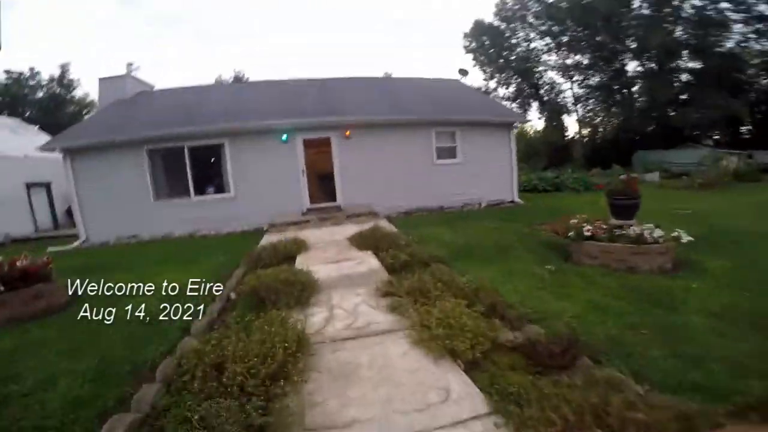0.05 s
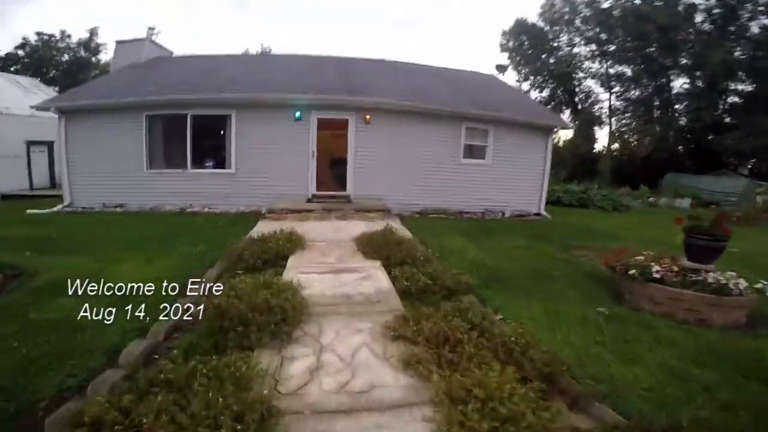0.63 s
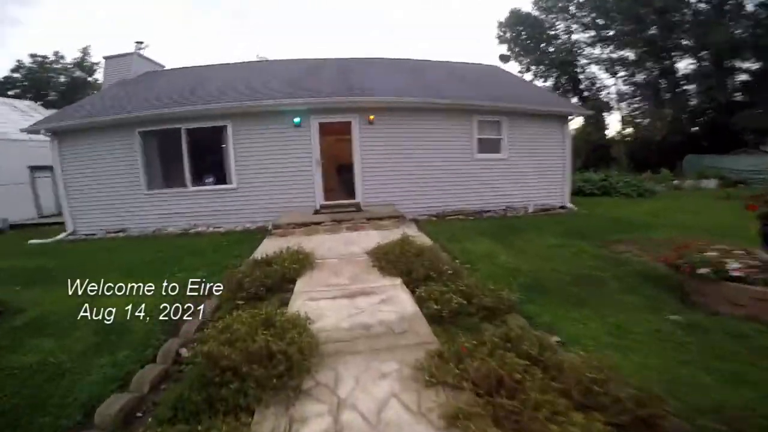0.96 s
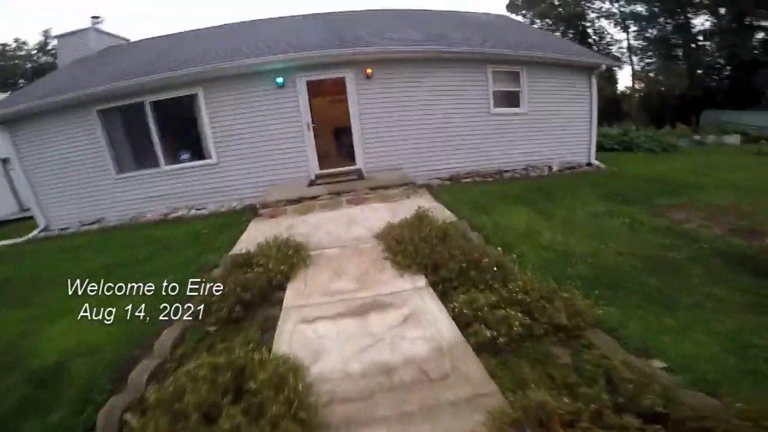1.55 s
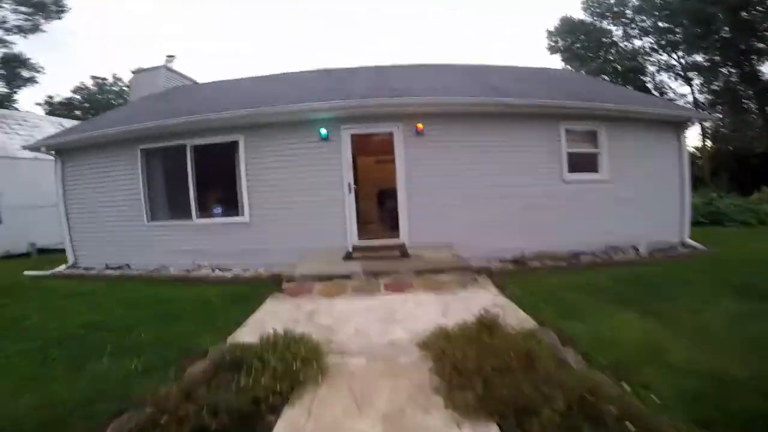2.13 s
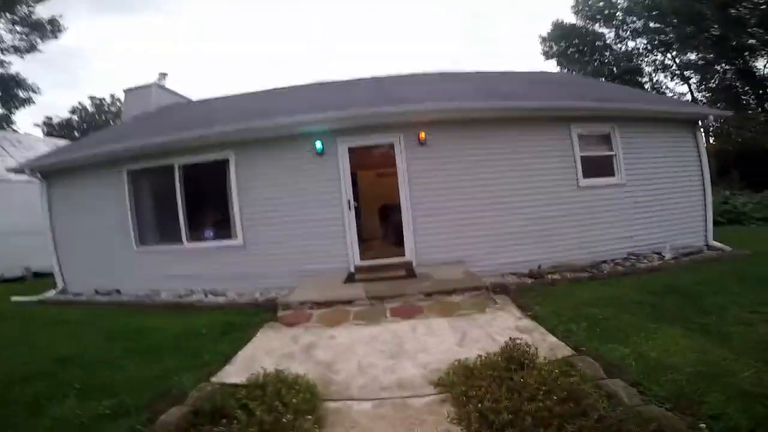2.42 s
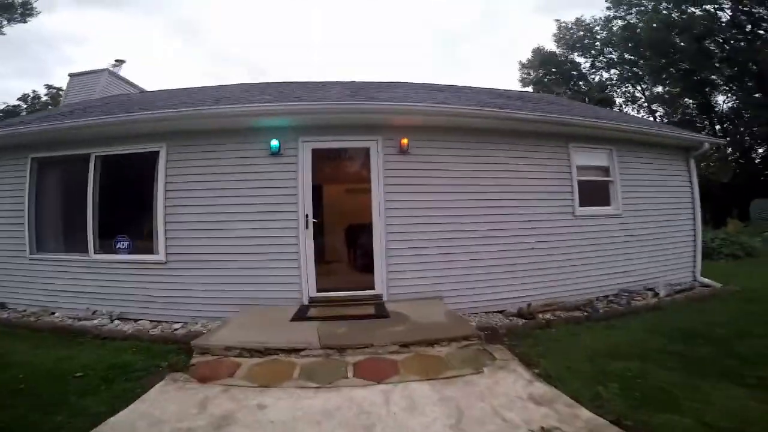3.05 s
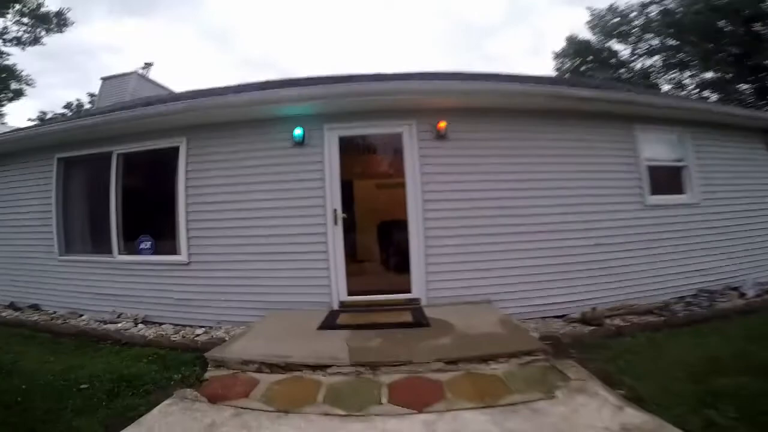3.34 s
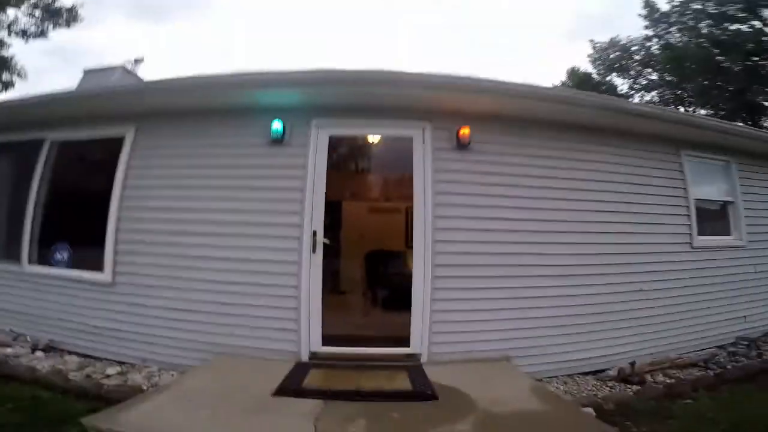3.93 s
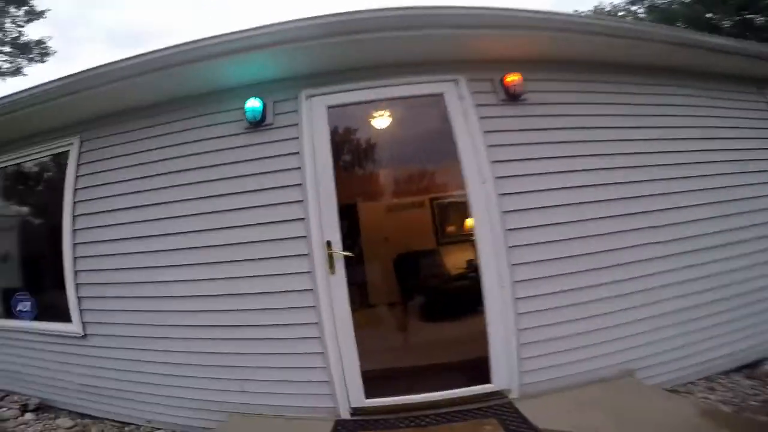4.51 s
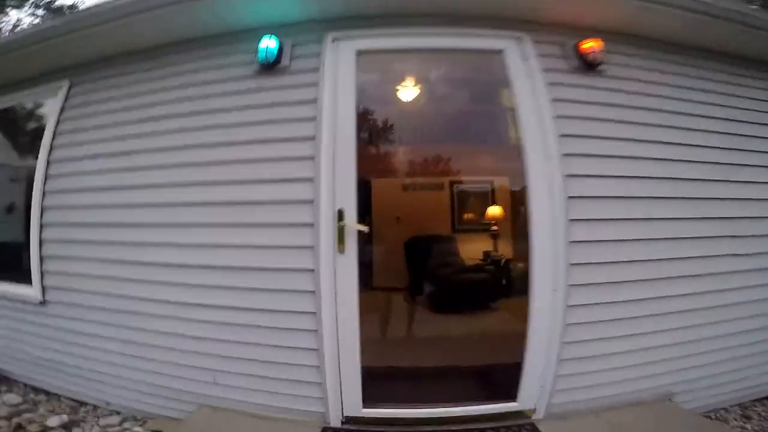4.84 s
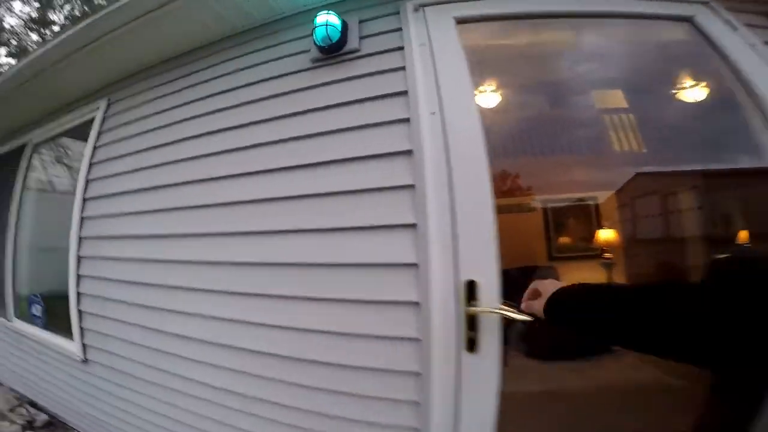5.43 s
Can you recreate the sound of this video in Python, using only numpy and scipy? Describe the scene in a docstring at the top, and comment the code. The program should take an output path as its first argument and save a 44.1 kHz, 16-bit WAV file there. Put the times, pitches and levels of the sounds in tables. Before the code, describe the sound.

Fingers rub, scrape and click on a handheld camera, close up, over dull footsteps on a concrete path outdoors.

```python
"""A concrete path up to a house on a still evening, heard from a small camera in the walker's hand.
Steps thud up through the body, and a thin chirp echoes in the yard. Just after 1 s the fingers regrip:
a loud scrape right on the microphone port, knocks, and a squeak while the hand half covers the port.
A sleeve brushes by; from 2 s rubbing strokes and sharp ticks ring the plastic shell. After 3.5 s the
hand quietens and soles scuff below. Soft air and faint, far insects lie behind it all."""
import sys
import numpy as np
from scipy import signal
from scipy.fft import rfft, irfft, next_fast_len
from scipy.io import wavfile
from scipy.ndimage import map_coordinates

SR = 44100
rng = np.random.default_rng(int(sys.argv[2]) if len(sys.argv) > 2 else 0)


def bounce(signal):
    """Save signal as a 16-bit WAV file at the path given by the first command-line argument."""
    frames = np.transpose(np.atleast_2d(signal))
    limited = np.clip(frames, -1, 1)
    pcm = np.round(limited * 32767).astype(np.int16)
    wavfile.write(sys.argv[1], SR, pcm)


N = 250047

# fingers sliding on the case, centimetres from the microphone:
# (time of fastest moment [s], rise [s], fall [s], friction level [dB], shudder level [dB])
FINGER_STROKES = [(0.01, 0.047, 0.036, -35, -36.5), (0.075, 0.028, .03, -31.5, -26),
                  (0.133, 0.018, 0.082, -41.5, -44.5), (0.48, 0.042, .025, -38.5, -40),
                  (0.532, .025, 0.095, -39.5, -41), (0.692, 0.032, 0.059, -46, -41),
                  (0.822, 0.035, 0.021, -38.5, -43.5), (0.976, 0.062, 0.066, -41, -46.5),
                  (1.135, 0.053, 0.09, -32.5, -30), (1.22, 0.04, 0.043, -33, -20.5),
                  (1.325, 0.028, 0.034, -47, -42), (1.575, 0.087, 0.14, -43.5, -54),
                  (1.728, 0.013, 0.067, -34.5, -26.5), (1.81, 0.11, 0.18, -42.5, -36.5),
                  (2.0, 0.072, 0.18, -33, -43.5), (2.109, 0.069, .05, -27.5, -34),
                  (2.184, 0.053, 0.04, -22.5, -31.5), (2.286, 0.042, 0.083, -31.5, -32),
                  (2.399, 0.071, 0.028, -33.5, -40), (2.477, 0.11, 0.081, -27, -32),
                  (2.635, 0.039, 0.1, -33, -33.5), (2.737, 0.0071, 0.033, -29.5, -32.5),
                  (2.864, 0.067, 0.064, -24.5, -25.5), (3.014, 0.096, 0.16, -44, -38.5),
                  (3.262, 0.087, 0.071, -37, -38.5), (3.323, 0.027, 0.026, -24.5, -27),
                  (3.452, 0.062, 0.021, -36.5, -34), (3.81, 0.14, 0.068, -54, -56.5),
                  (3.935, 0.074, 0.031, -43, -34), (4.019, 0.058, 0.073, -52, -47.5),
                  (4.451, 0.024, 0.034, -36.5, -49), (4.504, 0.017, 0.052, -42, -45.5),
                  (4.915, 0.042, 0.03, -50.5, -51), (5.01, 0.044, 0.034, -44, -42),
                  (5.09, 0.038, 0.054, -48, -46), (5.64, 0.034, 0.074, -55.5, -53.5)]
# a finger scraping right on the port: (time [s], length [s], level [dB], treble tilt [dB/octave])
PORT_SCRAPES = [(1.134, 0.0044, -11.5, -6), (1.142, .018, -16, 0.5), (1.1697, 0.0064, -4, 1),
                (1.18, .003, -7.5, 4), (1.188, 0.017, -20, -4.5), (1.23, 0.012, -29, 0),
                (1.244, 0.022, -40.5, 0)]
# ticks and creaks of the case: (time [s], level [dB], centre [Hz], relative tap level [dB], t60 [s])
CASE_TICKS = [(.058, -16, 1700, -17, 0.023), (0.328, -35.5, 2030, -11, 0.016),
              (0.3858, -23, 2030, -20, 0.016), (0.481, -21.5, 3050, -32, .012),
              (0.6823, -26.5, 2600, -22, 0.014), (0.7638, -32, 3300, -28, 0.013),
              (1.1176, -4.5, 2080, -17, 0.0087), (1.3304, -21, 3460, -5, 0.0075),
              (1.4486, -32, 1670, -7.5, 0.0091), (1.6063, -17.5, 1830, -7.5, 0.014),
              (1.7127, -19, 1910, -8.5, 0.013), (1.7637, -5.5, 3020, -11, 0.0075),
              (1.8422, -31, 1880, -16, 0.014), (1.852, -14, 1890, -22, 0.011),
              (2.382, -18.5, 2220, -12, 0.011), (2.5414, -10, 2190, -11, 0.0073),
              (2.603, -24, 2080, -16, 0.014), (2.8563, -2.5, 2260, -20, 0.0065),
              (2.872, -12, 2430, -34, 0.013), (2.8905, -1.5, 2490, -19, 0.0065),
              (2.934, -18.5, 2240, -7, 0.0086), (3.148, -34.5, 2640, -29, 0.034),
              (3.3085, -10, 2350, -37, 0.014), (3.337, -1.5, 3700, -22, .0065),
              (3.3732, -18.5, 2500, -3.5, 0.011), (3.445, -20, 2120, -9.5, 0.027),
              (4.3374, -31, 4200, -17, 0.018), (4.8726, -29, 2620, -6.5, 0.012),
              (5.02, -23.5, 3870, -28, 0.0078), (5.3937, -35, 3660, -23, 0.0095)]
# fingertips landing on the case: (time [s], level [dB], settled pitch [Hz], t60 [s])
FINGER_KNOCKS = [(0.387, -16, 123, 0.013), (1.119, -11.5, 72, 0.1), (1.153, -9.5, 98.7, 0.14),
                 (1.174, -5.5, 85, 0.056), (1.211, -15, 171.5, 0.066), (1.331, -23, 115.3, 0.057),
                 (1.6122, -3.5, 118, 0.069), (1.7147, -10.5, 123, 0.1), (1.766, -11.5, 99, 0.067),
                 (2.093, -17.5, 103, 0.15), (2.541, -25.5, 264, 0.092), (2.891, -16, 96, 0.16),
                 (3.932, -19, 150, 0.022), (3.94, -9, 190, 0.025), (4.005, -21, 120, 0.022),
                 (4.979, -22, 109.2, 0.035)]
# skin squeaking on plastic: (time [s], pitch [Hz], level [dB])
SKIN_SQUEAK = [(1.825, 485.4, -45.5), (1.838, 596, -27.5), (1.843, 675, -26), (1.855, 731, -21),
               (1.859, 780, -39), (1.87, 845, -35.5), (1.9, 1058, -34), (1.915, 1070, -46)]
# a sleeve brushing past the port: (time [s], length [s], level [dB])
SLEEVE_BRUSHES = [(1.712, 0.035, -53), (1.964, 0.14, -49.5), (2.15, 0.037, -52.5), (2.28, 0.042, -53.5)]
# how far the hand covers the port: (time [s], cover [0-1])
PORT_COVER = [(1.33, 0.05), (1.42, 0.78), (1.52, 0.67), (1.57, 0.31), (1.68, 0.42), (1.74, 0.5),
              (1.9, 0.16), (2.0, 0.03)]
# footfalls and bumps carried to the camera: (middle time [s], level [dB], pitch [Hz], half length [s])
BODY_THUDS = [(0.08, -16, 54, 0.014), (0.519, -15, 40.5, 0.014), (1.186, -5, 34, 0.013),
              (1.338, -22.5, 72, 0.008), (1.927, -18.5, 51, 0.015), (3.331, -16, 54, 0.0054),
              (3.408, -18, 17.6, 0.058), (3.878, -13.5, 33, 0.018), (3.96, -15.5, 19, 0.015),
              (4.138, -26.5, 39.7, 0.029), (4.452, -18, 30, 0.024), (4.525, -19, 16.8, 0.054),
              (4.734, -25, 38, 0.02), (5.308, -27, 40.5, 0.02)]
# soles on the concrete below: (time [s], length [s], level [dB], relative hollow level [dB])
SOLE_SCUFFS = [(2.087, 0.01, -31, 2), (3.86, .012, -38, -17), (3.907, 0.0028, -28, -1),
               (3.917, 0.0056, -30, -7), (3.928, 0.0075, -24.5, -36), (3.939, 0.0052, -28, -4.5),
               (4.004, 0.0075, -48.5, -3), (4.426, 0.0031, -39.5, -4.5), (4.454, 0.0094, -42.5, -20),
               (4.502, 0.0037, -32.5, -6.5), (4.979, 0.0016, -50, 6.5), (5.298, 0.0037, -49.5, -3.5),
               (5.503, 0.0019, -41, -10)]
# a thin chirp in the yard, rising briefly and then falling: (time [s], pitch [Hz], level [dB])
YARD_CHIRP = [(.196, 4700, -41), (.207, 5080, -49), (.213, 5620, -26), (.228, 4700, -56), (.245, 4050, -47),
              (.258, 2950, -51), (.268, 2440, -66), (.29, 2050, -76)]
# resonances of the plastic shell: (centre [Hz], half width [Hz], lift [dB])
SHELL_RESONANCES = [(770, 130, 6), (1530, 70, 5), (2150, 130, 6), (2490, 100, 4), (3050, 130, 3),
                    (3520, 230, 9), (4280, 120, 6), (4720, 110, 4), (5130, 240, 10), (6950, 180, 10),
                    (7900, 450, 8), (9280, 330, 15), (12150, 350, 11)]

# tone colours at the microphone, each (frequency [Hz], relative level [dB])
FRICTION_SPECTRUM = [(150, -26.5), (400, -25), (600, -19), (1100, -16), (1900, 2), (2400, -0.5), (3000, -7),
                     (4000, -14.5), (5000, -22), (6000, -32), (9000, -39.5), (11000, -46), (15000, -51)]  # skin sliding on plastic
SHUDDER_SPECTRUM = [(30, -4), (70, 8), (110, 1.5), (165, -3), (270, -7), (420, -20.5), (700, -32.5),
                    (1500, -52.5)]  # the case shaking in the grip
SCRAPE_SPECTRUM = [(100, -4.5), (300, -2.5), (600, -19), (1050, -16), (1550, 0), (2700, 1), (3800, 5),
                   (4600, -10.5), (5500, -11.5), (7000, -13), (8500, -20.5), (10500, -20.5), (15500, -36)]  # a finger on the port
TICK_SPECTRUM = [(200, -22), (700, -17.5), (1500, 1.5), (2800, 1.5), (4500, -5.5), (6500, -16),
                 (10000, -21), (15000, -31)]  # plastic snapping
HOLLOW_SPECTRUM = [(80, -13), (200, 0.5), (350, -3), (550, -10.5), (800, -1.5), (1300, -22), (2500, -30),
                   (6000, -62.5)]  # the hollow body of ticks and scuffs
SQUEAK_SPECTRUM = [(400, -16), (720, 3), (1000, -7), (1600, 8), (3200, -2), (3900, -11.5), (4700, -11),
                   (5800, -53)]  # squeaking skin
SLEEVE_SPECTRUM = [(1000, -29), (3000, 8.5), (5000, -3), (7500, 5), (10500, -10.5), (15000, -10.5)]  # hissing cloth
GRIT_SPECTRUM = [(300, 7.5), (700, -9), (1150, -8.5), (2000, 10.5), (3200, -1.5), (4600, -8), (6000, -39),
                 (15000, -49)]  # grit under a sole
RUMBLE_SPECTRUM = [(8, -23), (18, 0.5), (30, -6), (60, -16), (110, -24), (250, -58), (600, -92)]  # the carrying arm
CHIRP_SPECTRUM = [(1500, -8), (2500, 15.5), (5500, -4), (9200, 6.5), (11000, -17), (14000, -16)]  # the shrill chirp
AIR_SPECTRUM = [(120, 8), (250, 4.5), (450, -1), (1000, 1.5), (2200, -8), (3000, -2), (4500, 2),
                (6200, -4.5), (8000, -5.5), (10000, -13), (15000, -14.5)]  # open evening air


def rubbing(slips_per_s=900, flutter_db=1.17, resting_grip_db=-63.5):
    """Sliding fingers make a stream of tiny slips over smooth friction, ringing the shell."""
    strokes = [(db, swell(s, rise, fall)) for s, rise, fall, db, _ in FINGER_STROKES]
    slips = (rng.random(N) < slips_per_s / SR) * rng.standard_normal(N)
    force = (unit(slips) + rng.standard_normal(N)) * amp(flutter_db * wobble(130))
    ringing = filtered(force, lambda hz: gain(FRICTION_SPECTRUM, hz) * shell(hz))
    return power_sum(resting_grip_db, strokes) * unit(ringing)


def shell(hz):
    """Gain of the plastic shell around the microphone, lifted at its resonances."""
    return amp(sum(db * np.exp(-((hz - centre) / width) ** 2) for centre, width, db in SHELL_RESONANCES))


def case_shudder(resting_grip_db=-58.5):
    """In each stroke the skin catches and shakes the case; even a resting grip is never quite still."""
    catching = amp(3 * wobble(45))
    shaking = noise(lambda hz: gain(SHUDDER_SPECTRUM, hz)) * catching
    return power_sum(resting_grip_db, shudder_swells()) * unit(shaking)


def shudder_swells(spread=1.33):
    """Each stroke's (level [dB], envelope) of shaking, spread times as long as its friction."""
    return [(db, swell(s, spread * rise, spread * fall)) for s, rise, fall, _, db in FINGER_STROKES]


def port_scrapes(t60=0.024, attack=0.00043, chatter_db=3):
    """Right on the microphone port each slip is loud and bright, and chatters as the skin catches."""
    out = np.zeros(N)
    chatter = amp(chatter_db * wobble(500))
    for s, length, db, tilt_db in PORT_SCRAPES:
        tilt = lambda hz: amp(tilt_db * np.log2(np.maximum(hz, 1200) / 3000))
        smooth = slide_envelope(length, attack, t60)
        envelope = smooth * chatter[round(s * SR):][:len(smooth)]
        envelope *= np.linalg.norm(smooth) / np.linalg.norm(envelope)
        add(out, s, amp(db) * burst(lambda hz: gain(SCRAPE_SPECTRUM, hz) * tilt(hz), envelope))
    return out


def case_ticks(attack=0.00093, focus_db=7, focus_octaves=0.45, edge_ratio=1.3,
               tail_db=-30, tail_t60=0.036, clean_t60=0.0077):
    """The case snaps under the grip: a short ring in the shell over a hollow tap."""
    out, t = np.zeros(N), np.arange(SR // 10) / SR
    for s, db, centre_hz, hollow_db, t60 in CASE_TICKS:
        decay = amp(-60 * t / t60) + amp(tail_db - 60 * t / tail_t60)
        envelope = (1 - np.exp(-t / attack)) * decay
        focus = lambda hz: amp(focus_db * np.exp(-(np.log2((hz + 1) / centre_hz) / focus_octaves) ** 2))
        rolloff = lambda hz: 1 / np.sqrt(1 + (hz / (edge_ratio * centre_hz)) ** 4)  # lower is duller
        colour = lambda hz: gain(TICK_SPECTRUM, hz) * shell(hz) * focus(hz) * rolloff(hz)
        snap = burst(colour, envelope, impact=(clean_t60 / t60) ** 2)  # shorter is cleaner
        tap = amp(hollow_db) * burst(lambda hz: gain(HOLLOW_SPECTRUM, hz), envelope)
        add(out, s, amp(db) * (snap + tap))
    return out


def finger_knocks(pitch_lift=0.68, settle=0.005, attack=0.0025):
    """A fingertip thumps the case; the pitch sags unevenly as the flesh gives way."""
    out, t = np.zeros(N), np.arange(SR // 4) / SR
    give = 1 + 0.14 * wobble(260)
    for s, db, hz, t60 in FINGER_KNOCKS:
        pitch_hz = hz * (1 + pitch_lift * np.exp(-t / settle)) * give[round(s * SR):][:len(t)]
        envelope = amp(db - 60 * t / t60) * (1 - np.exp(-t / attack))
        add(out, s, -envelope * np.sin(2 * np.pi * np.cumsum(pitch_hz) / SR))
    return out


def skin_squeak():
    """Skin on the plastic beside the microphone gives a rough, rubbery, rising squeak."""
    return glide(SKIN_SQUEAK, SQUEAK_SPECTRUM, jitter=0.1, partials=7)


def sleeve(attack=0.01, t60=0.13):
    """Cloth passing close over the port gives a dry hiss."""
    contact = np.zeros(N)
    for s, length, db in SLEEVE_BRUSHES:
        add(contact, s, amp(db) * slide_envelope(length, attack, t60, size=SR // 3))
    return contact * amp(1.2 * wobble(200)) * noise(lambda hz: gain(SLEEVE_SPECTRUM, hz))


def hand_over_port(x, full_cover_db=-15, corner_hz=2300):
    """A hand over the microphone port takes the treble away."""
    cover, = curves(PORT_COVER)
    low = filtered(x, lambda hz: 1 / (1 + (hz / corner_hz) ** 6))
    return low + (x - low) * amp(full_cover_db * cover)


def footfalls():
    """Each footfall reaches the microphone through the body as one soft push and rebound."""
    out = np.zeros(N)
    for s, db, hz, half_length in BODY_THUDS:
        t = np.arange(N) / SR - s
        out -= amp(db) * np.exp(-(t / half_length) ** 2) * np.sin(2 * np.pi * hz * t)
    return out


def sole_scuffs(t60=0.014, attack=0.00026):
    """Down on the path a sole grinds the grit, dull and hollow."""
    out = np.zeros(N)
    for s, length, db, hollow_db in SOLE_SCUFFS:
        envelope = slide_envelope(length, attack, t60)
        grit = burst(lambda hz: gain(GRIT_SPECTRUM, hz), envelope)
        hollow = amp(hollow_db) * burst(lambda hz: gain(HOLLOW_SPECTRUM, hz), envelope)
        add(out, s, amp(db) * (grit + hollow))
    return out


def arm_sway(floor_db=-40, jolt_db=-14, nudge_db=-1):
    """The carrying arm rumbles, more around each footfall and whenever the fingers push the case."""
    jolts = [(db + jolt_db, swell(s, rise=0.11, fall=0.17)) for s, db, _, _ in BODY_THUDS]
    nudges = [(db + nudge_db, envelope) for db, envelope in shudder_swells()]
    return power_sum(floor_db, jolts + nudges) * noise(lambda hz: gain(RUMBLE_SPECTRUM, hz))


def yard_chirp(echo_db=-9, echo_t60=0.42):
    """A faint high chirp, smeared by the yard's echo."""
    chirp = glide(YARD_CHIRP, CHIRP_SPECTRUM, jitter=0.04, partials=3)
    t = np.arange(SR // 4) / SR
    yard = rng.standard_normal(len(t)) * amp(-60 * t / echo_t60)
    echo = signal.fftconvolve(chirp, yard / np.linalg.norm(yard))[:N]
    return chirp + amp(echo_db) * echo


def evening(air_db=-59.0, insect_db=-69, insect_hz=5520, insect_width_hz=260):
    """Soft air all around, and far from the microphone a narrow band of insects."""
    air = amp(air_db) * noise(lambda hz: gain(AIR_SPECTRUM, hz))
    chorus = amp(insect_db + 0.89 * wobble(9))
    insects = chorus * noise(lambda hz: np.exp(-((hz - insect_hz) / insect_width_hz) ** 2))
    return air + insects


def glide(rows, spectrum, jitter, partials, rough_db=3):
    """A short harmonic tone, unsteady in pitch and strength."""
    pitch_hz, db = curves(rows)
    t = np.arange(N) / SR
    sounding = (t > rows[0][0]) & (t < rows[-1][0])
    phase = 2 * np.pi * np.cumsum(pitch_hz * (1 + jitter * wobble(1300))) / SR
    tone = sum(np.sin(k * phase + wobble(250)) for k in range(1, partials + 1))
    tone *= amp(rough_db * wobble(600))
    tone = filtered(tone, lambda hz: gain(spectrum, hz))
    return tone / tone[sounding].std() * amp(db) * sounding


def burst(response, envelope, impact=0):
    """A short random force rings a body with its envelope's energy; impact adds a clean blow on top."""
    size = len(envelope)
    force = rng.standard_normal(size) * envelope
    force[np.argmax(envelope)] += impact * np.linalg.norm(envelope)
    ringing = irfft(rfft(force) * minimum_phase(response, size), size)
    return ringing * np.linalg.norm(envelope) / np.linalg.norm(ringing)


def minimum_phase(response, size):
    """The filter with this gain that rings only after it is struck."""
    log_gain = np.log(np.maximum(response(np.fft.rfftfreq(size, 1 / SR)), 1e-6))
    cepstrum = irfft(log_gain, size)
    cepstrum[1:size // 2] *= 2
    cepstrum[size // 2 + 1:] = 0
    return np.exp(rfft(cepstrum))


def slide_envelope(length, attack, t60, size=SR // 10):
    """A short slide that dies away when the surfaces stick."""
    t = np.arange(size) / SR
    return (1 - np.exp(-t / attack)) * amp(-60 * np.maximum(t - length, 0) / t60)


def swell(s, rise, fall, drop_db=14.5, roundness=1.51):
    """A movement is fastest at time s, and drop_db weaker one rise earlier or one fall later."""
    t = np.arange(N) / SR - s
    from_peak = np.minimum(np.maximum(-t / rise, t / fall), 10)
    return amp(-drop_db * from_peak ** roundness)


def power_sum(floor_db, movements):
    """Strength of overlapping (level [dB], envelope) movements over a steady floor."""
    return np.sqrt(amp(floor_db) ** 2 + sum((amp(db) * envelope) ** 2 for db, envelope in movements))


def amp(db):
    return 10 ** (np.asarray(db) / 20)


def unit(x):
    return x / np.sqrt(np.mean(x ** 2) + 1e-20)


def gain(points, hz):
    """Gain of (frequency [Hz], level [dB]) points joined on a log axis."""
    point_hz, db = np.transpose(points)
    return amp(np.interp(np.log(hz + 1), np.log(point_hz + 1), db))


def curves(rows):
    """One value per sample for each column after the time."""
    times, *columns = np.transpose(rows)
    return [np.interp(np.arange(N) / SR, times, column) for column in columns]


def wobble(rate):
    """A smooth random curve, rate knots a second."""
    knots = rng.standard_normal(int(N * rate / SR) + 4)
    return map_coordinates(knots, [np.arange(N) * rate / SR])


def filtered(x, response):
    """x shaped by a gain that depends on frequency."""
    size = x.shape[-1]
    padded = next_fast_len(size + 8192)
    return irfft(rfft(x, padded) * response(np.fft.rfftfreq(padded, 1 / SR)), padded)[..., :size]


def noise(response):
    """Coloured noise of rms 1."""
    return unit(filtered(rng.standard_normal(N), response))


def add(track, s, x):
    """Mix x into the track from time s."""
    start = max(round(s * SR), 0)
    track[start:start + len(x)] += x[:N - start]


def scene(left_db=2.95, right_db=-4.55, hiss_db=-90.5):
    """Everything reaches both channels, the left one stronger; each has its own faint hiss."""
    steps = footfalls() + sole_scuffs() + arm_sway()
    hand = sleeve() + case_shudder() + finger_knocks() + case_ticks() + port_scrapes() + skin_squeak()
    at_microphone = steps + hand + yard_chirp() + hand_over_port(rubbing() + evening())
    hiss = amp(hiss_db) * rng.standard_normal((2, N))
    return at_microphone * amp([[left_db], [right_db]]) + hiss


def record(dry, band_limit_hz=15600):
    """The loudest scrape overloads the camera, which keeps nothing above its band limit."""
    return filtered(np.clip(dry, -1, 1), lambda hz: 1 / (1 + (hz / band_limit_hz) ** 120))


dry = scene()
out = record(dry)
bounce(out)
```